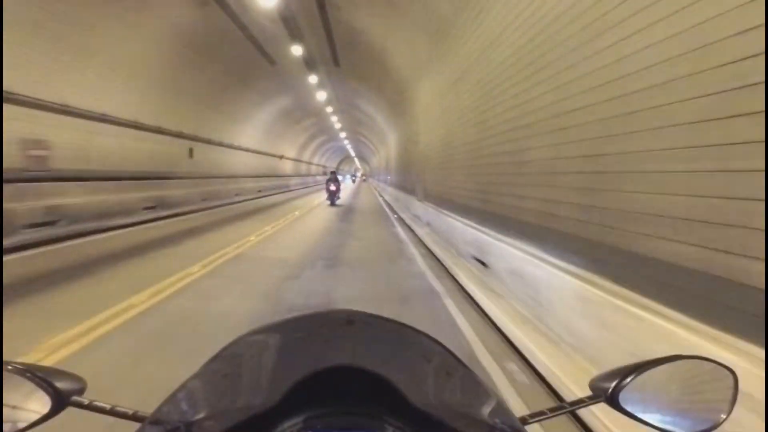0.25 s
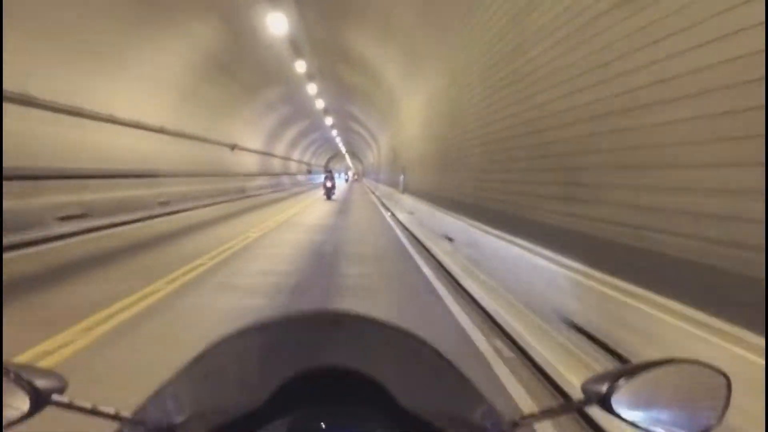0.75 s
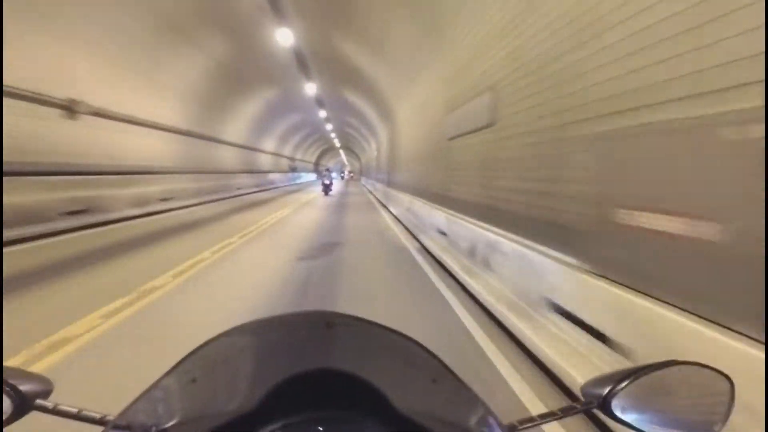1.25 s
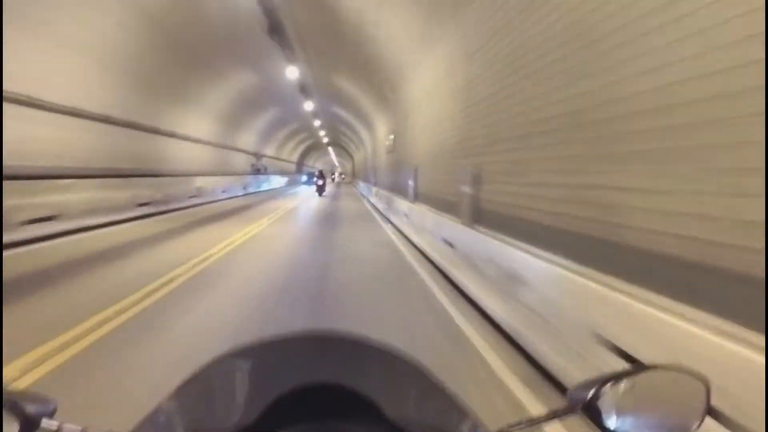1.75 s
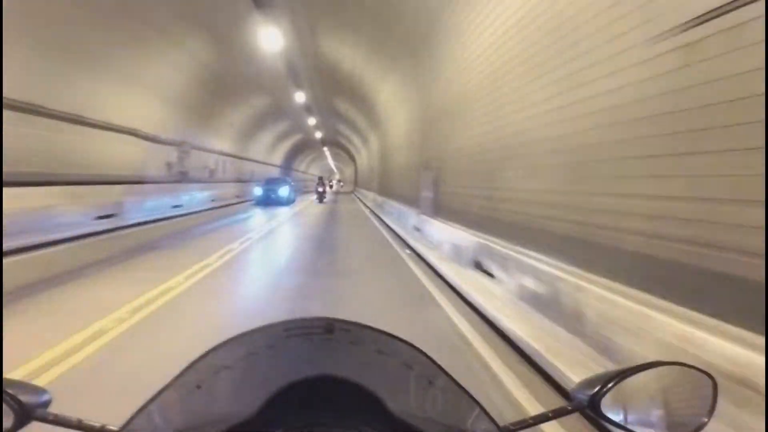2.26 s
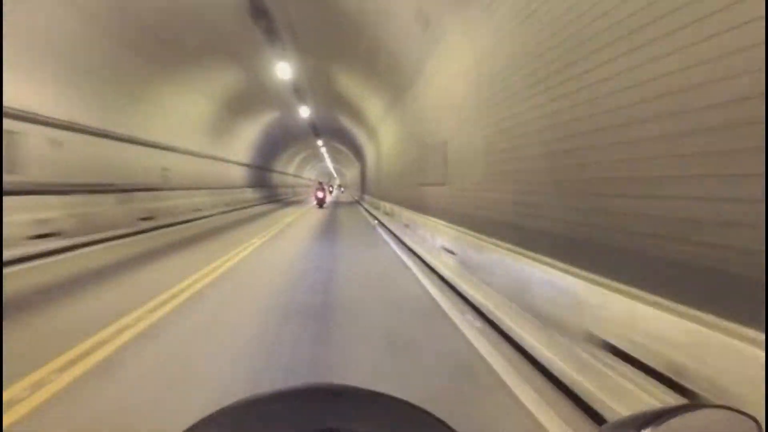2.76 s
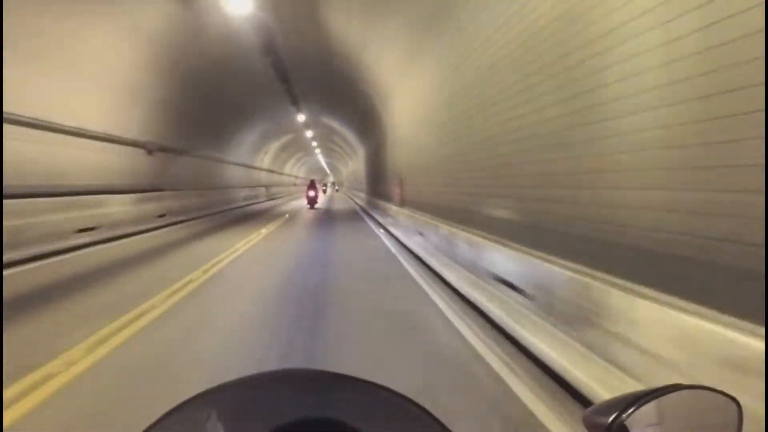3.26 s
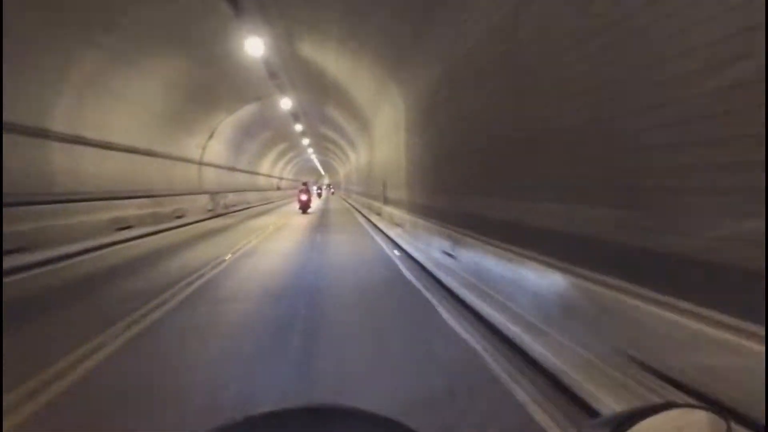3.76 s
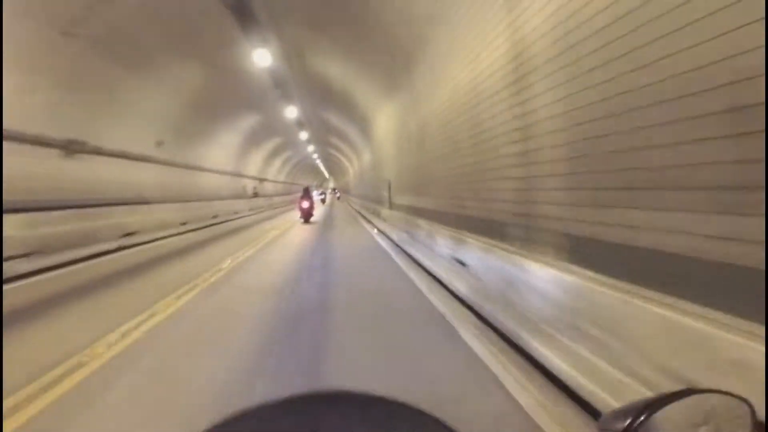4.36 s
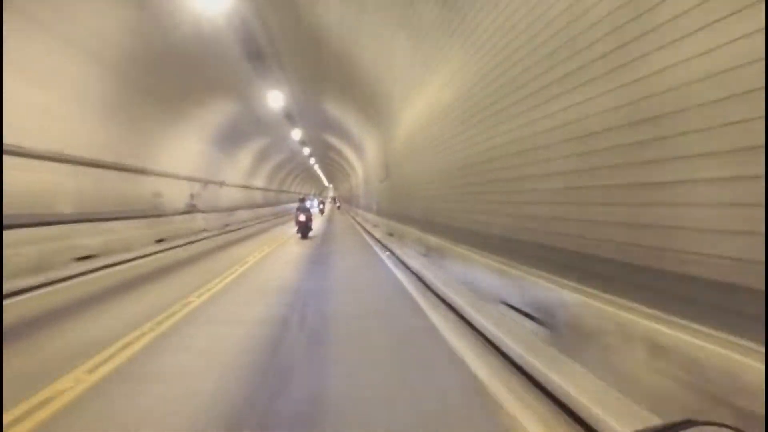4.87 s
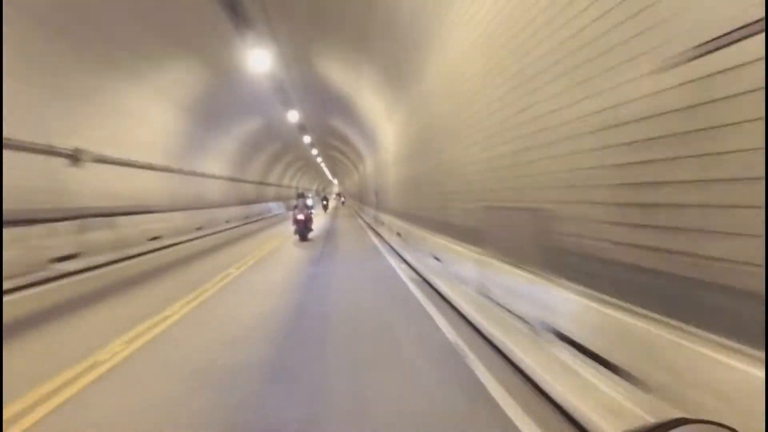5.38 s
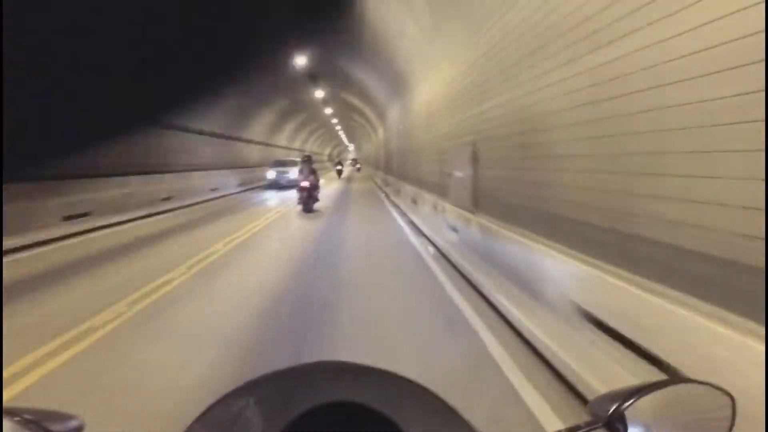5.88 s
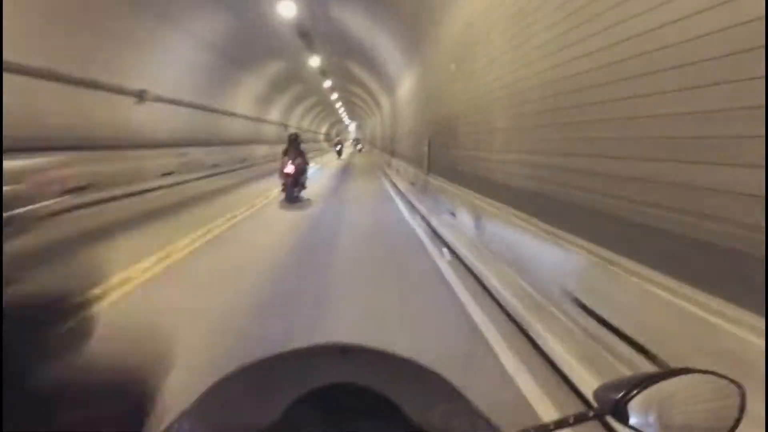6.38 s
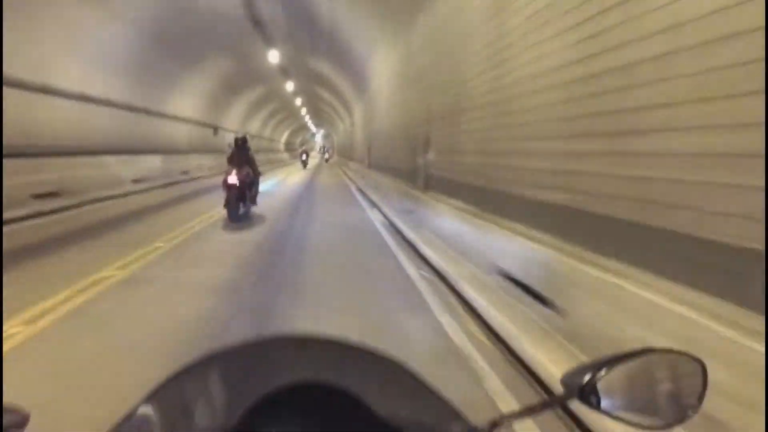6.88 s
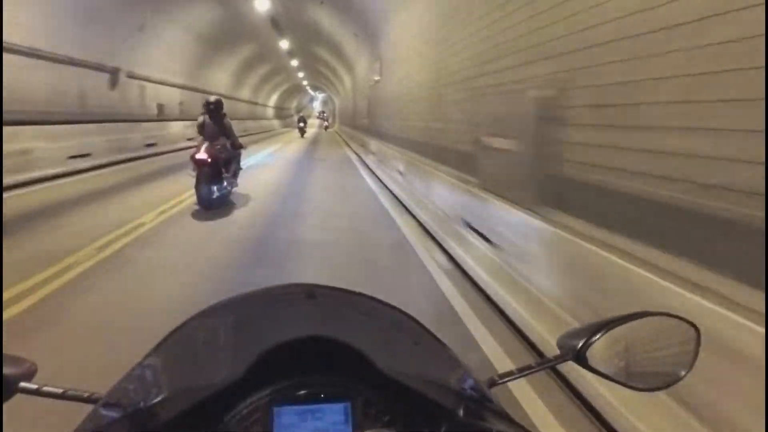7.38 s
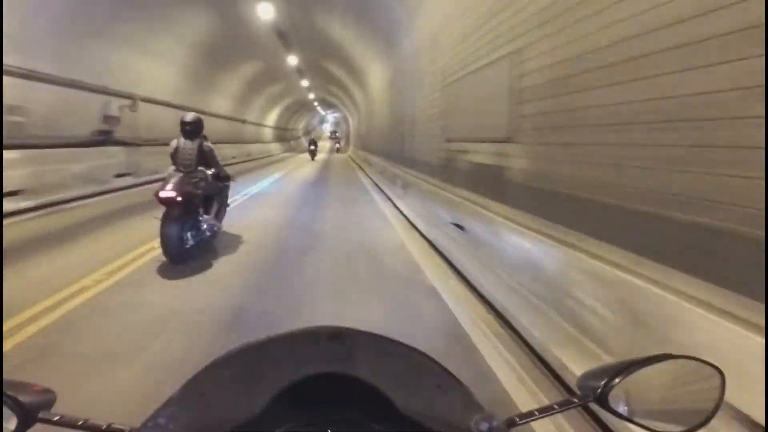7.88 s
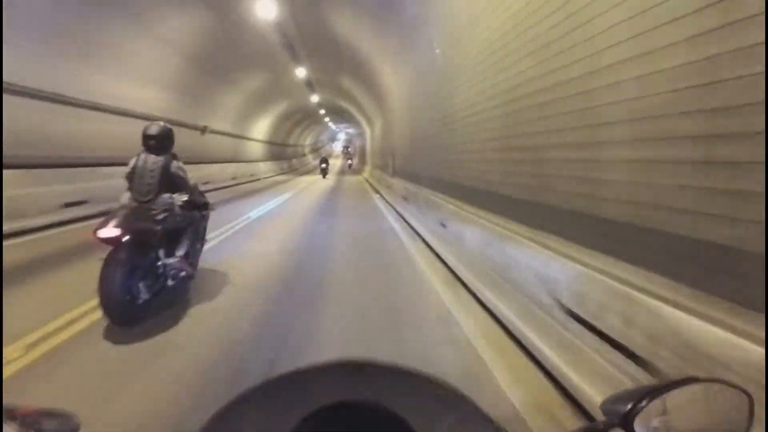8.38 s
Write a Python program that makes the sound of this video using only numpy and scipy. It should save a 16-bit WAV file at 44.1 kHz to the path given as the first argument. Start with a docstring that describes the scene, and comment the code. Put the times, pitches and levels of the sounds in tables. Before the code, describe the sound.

Several sport motorcycles drone and rev through a tiled road tunnel, one close engine blipping its throttle, with wind buffeting and a sharp late backfire.

```python
"""Motorcycles in a tiled tunnel

Five four-cylinder sport motorcycles pass through a tiled road tunnel, heard from two ports on a helmet.
Each engine is a gliding firing note with overtones and puffs of gas; the near one blips its throttle.
Noise bursts crack in a pipe and a crackling backfire rolls back along the tube.
Echo tails smear everything; three bands of noise make wind buffeting, a blurred roar and hiss."""
import sys
import numpy as np
from scipy import signal
from scipy.fft import rfft, irfft, next_fast_len
from scipy.io import wavfile
from scipy.ndimage import uniform_filter1d, minimum_filter1d, map_coordinates

SR = 44100
rng = np.random.default_rng(int(sys.argv[2]) if len(sys.argv) > 2 else 0)


def master(y):
    """Save y as 16-bit WAV."""
    cut = np.clip(np.atleast_2d(y).T, -1, 1)
    pcm = np.round(cut * 32767)  # scale
    wavfile.write(sys.argv[1], SR, pcm.astype(np.int16))


N = 380583

# Course of each engine: [t/s, firing rate f/Hz, firing note level/dB, overtones level/dB, half multiples level/dB]
LEADER = [(0.0, 213, -34, -23.5, -40), (0.5, 252.4, -32.5, -22, -32.5), (1.0, 285.1, -26.5, -24.5, -36.5),
          (1.36, 306.9, -27.5, -24.5, -42), (1.47, 273.3, -20, -33.5, -50), (1.58, 230, -28, -23.5, -40),
          (2.05, 244.2, -21.5, -26, -46), (2.3, 252.3, -39.5, -19, -41), (2.37, 250.7, -36, -28.5, -42),
          (2.5, 248.2, -35, -39, -45)]
SHIFTER = [(0.0, 283.7, -31, -32.5, -16), (0.2, 297.7, -35, -24.5, -25), (0.47, 306.4, -33, -24, -25),
           (0.62, 257.4, -25.5, -45, -38), (0.85, 217.4, -33.5, -22.5, -40)]
CRUISER = [(0.95, 237.6, -47, -31, -48.5), (1.6, 242.4, -27, -23, -34.5), (2.15, 239.9, -31.5, -40, -27),
           (2.4, 224.8, -26, -36, -30.5), (2.9, 226.5, -26.5, -40, -29), (3.3, 221, -29, -44, -37),
           (3.5, 217.6, -25.5, -45.5, -35.5), (3.9, 207.3, -27.5, -48, -25), (4.2, 199, -22, -42, -27),
           (4.6, 194.3, -28, -39, -26), (5.0, 188.4, -22.5, -48, -34.5), (5.5, 179.4, -27.5, -33, -23),
           (5.65, 178.3, -31.5, -40.5, -28.5), (6.1, 178.3, -36, -41, -29.5)]
NEAR = [(2.32, 251.3, -23.5, -34, -44), (2.44, 252.8, -18, -36.5, -42), (2.51, 228.3, -22.5, -31.5, -64),
        (2.85, 240.4, -19, -37, -55), (3.12, 249, -23, -43.5, -37.5), (3.22, 191.5, -19.5, -48, -30),
        (3.45, 194.7, -20, -48.5, -35.5), (3.7, 192.6, -19.5, -48.5, -42.5),
        (4.07, 190.5, -21.5, -38, -35.5), (4.2, 229.5, -22, -38, -35.5), (4.6, 230.6, -23.5, -38, -25),
        (5.04, 224.3, -24, -39, -24), (5.14, 222.5, -23, -37, -30), (5.65, 214.5, -22, -38, -31),
        (5.9, 211.5, -23, -40.5, -36.5), (6.5, 203.3, -20.5, -37.5, -38), (6.95, 199.8, -22.5, -43, -45),
        (7.2, 194.5, -13.5, -30.5, -47.5), (7.45, 196.7, -23.5, -31.5, -35.5), (7.8, 186.1, -18, -37, -34),
        (7.9, 172, -24, -34.5, -38), (8.0, 180, -25, -37, -39), (8.05, 190, -18, -25, -40),
        (8.1, 194, -19, -26, -40), (8.13, 186, -21, -42, -39), (8.2, 188.3, -19, -39, -31.5),
        (8.63, 180.1, -19.5, -36.5, -35)]
FOLLOWER = [(7.95, 159, -31.5, -31, -21), (8.12, 164.4, -31.5, -36.5, -39), (8.19, 167.6, -29, -29, -26.5),
            (8.25, 166.3, -33.5, -31.5, -29), (8.31, 168.2, -31, -21.5, -22),
            (8.38, 168.5, -31.5, -29, -25.5), (8.5, 167.5, -40.5, -30, -28.5), (8.63, 169, -40, -34.5, -36)]
# Exhaust overtones; half multiples come from uneven cylinders:
# [multiple of the firing rate, level/dB added to the engine's overtones or half multiples]
LEADER_PIPE = [(1.5, -8.5), (2, 1), (3, -9), (3.5, -13), (4, -13), (5, -21), (6, -24), (7, -29)]
SHIFTER_PIPE = [(2, -10), (3, -7.5), (4, -20)]
CRUISER_PIPE = [(.5, -12), (1.5, -7.5), (2, -6), (3, -6.5), (4, -11), (5, -17.5)]
NEAR_PIPE = [(.5, -14), (1.5, -1), (2, 3), (2.5, -2.5), (3, -8), (4, -12), (5, -20)]
FOLLOWER_PIPE = [(1.5, -3), (2, -6), (3, -4), (4, -5), (6, -16)]
# Gas rushing from the pipe, relative density: [f/Hz, level/dB per Hz]
RASP = [(300, -32), (600, 5.5), (1200, -5), (2500, -13), (5000, -54)]
# Throttle blips of the near engine: [t/s, rise f/Hz, rise time/s, settling time/s, overtone bark level/dB]
BLIPS = [(2.505, 56, .085, .2, 11), (2.845, 46, .085, .17, 18), (4.085, 20, .11, .04, 19),
         (7.9, 46, .07, .25, 17)]
# Irregular throb of the near engine: [t/s, depth/dB]
THROB = [(2.3, 3.5), (4.0, 3.5), (4.8, 3.5), (5.6, 2.5), (6.2, 0), (7.0, 0), (7.3, 2.5), (8.63, 2.5)]
# Exhaust pops: [t/s, level/dB, burst dull above f/Hz, snap level/dB, length/s]
POPS = [(4.09, -14, 600, -55, .018), (7.3163, -4, 1200, -15, .0068), (7.495, -9, 400, -55, .012),
        (7.733, -11, 400, -55, .01), (7.908, -15, 480, -55, .012)]
# Backfire rolling back along the tube, then once more from farther off: [t/s, level/dB, hold/s]
RETURNS = [(7.324, -25.5, 0.19), (7.649, -37, .085)]
# Colour of those returns, relative density: [f/Hz, level/dB per Hz]
RETURN_TONE = [(350, -36), (700, -15.5), (1050, 2.5), (1700, -9.5), (2700, -9), (3100, -23.5),
               (4600, -16.5), (6000, -28.5), (7500, -28.5), (10000, -38), (13500, -50), (14200, -90)]
# Tunnel decay: [f/Hz, time to fall 60 dB/s]
TUBE = [(150, 0.88), (1000, 1), (8000, 0.35)]
# Air noise before the gusts: [t/s, buffet level/dB, roar level/dB, hiss level/dB]
AIR = [(0.0, -34, -19.5, -45.5), (0.8, -33, -26.5, -47.5), (1.35, -30, -20, -44.5), (2.1, -32, -25.5, -48),
       (2.9, -28.5, -22, -46.5), (3.6, -27.5, -23, -47), (4.3, -26.5, -22, -46), (5.0, -33, -25.5, -49.5),
       (5.6, -27, -23, -47), (6.2, -33.5, -25.5, -47.5), (6.36, -35, -30.5, -56), (6.95, -37.5, -32.5, -60),
       (7.3, -25, -22, -45), (7.9, -34.5, -24, -50.5), (8.63, -28.5, -32, -54)]
# Gusts: [t/s, swell level/dB, half width/s]
GUSTS = [(.24, 3, 0.015), (1.07, 4, .02), (1.78, 4, 0.02), (2.24, 0, .04), (2.42, 2.5, 0.046),
         (2.68, 2.5, .08), (3.04, 2, 0.026), (3.38, 2.5, 0.18), (3.70, 2.5, 0.035), (3.88, 4.5, 0.023),
         (4.1, 6, 0.044), (4.4, 2.5, 0.05), (4.75, 5, 0.086), (4.99, 6.5, 0.024), (5.19, 2, 0.056),
         (5.64, 4, 0.062), (5.89, 5.5, 0.05), (6.25, 6, 0.041), (6.49, 11.5, 0.1), (6.75, 6.5, 0.093),
         (7.11, 6, 0.018), (7.72, 4.5, 0.031), (8.05, 1.5, .1), (8.34, 3, 0.14)]
# Colours of the air noise, relative density: [f/Hz, level/dB per Hz]
BUFFET = [(12, -39.5), (20, -8.5), (53, 0.5), (129, -2.5), (160, 2), (210, -27.5), (350, -120)]
ROAR = [(71, -49), (120, -15), (151, -27), (214, -2), (277, -10.5), (468, -12), (542, -11), (637, -17),
        (1060, -21.5), (3000, -42.5), (3900, -51.5), (6600, -120)]
HISS = [(1200, -15), (2000, -6), (2600, -2.5), (3200, -4), (4500, -5), (5800, -11), (7000, -12),
        (9000, -18.5), (11000, -25), (13500, -36.5), (13900, -91)]
# Likeness of the diffuse sound at the two ports: [f/Hz, correlation]
ALIKE = [(30, 0.7), (100, 0.76), (200, 0.95), (900, 0.86), (1600, 1), (2200, 0.34), (4500, 0.36),
         (5500, .1), (10000, .05)]
# Left port over right: [f/Hz, level/dB]
LEAN = [(60, 2), (200, 0.5), (1200, -.5), (4000, 2), (12000, 6)]
# Phase by which the left port leads: [f/Hz, phase/rad]
AHEAD = [(80, .04), (350, 0.1), (900, 0.14), (1400, 0.88), (1650, 0.81), (2400, 2.03), (3400, 3.85),
         (4200, 4.3), (5200, 4.05)]
# Brief level changes, mostly dips: [t/s, whole level/dB, further firing note level/dB, half width/s]
DIPS = [(0.265, -7, 0, 0.01), (1.704, -4, -3, 0.018), (2.308, -5.5, -7.5, 0.025), (2.4, 1.5, -8.5, 0.022),
        (2.518, 1.5, -7.5, .014), (2.678, 2, -1, 0.012), (2.757, -3, -2.5, 0.018), (2.846, -3.5, -7, 0.02),
        (2.928, -5, -2, 0.013), (3.045, -1.5, 5, 0.0074), (3.097, -6.5, -2.5, 0.02),
        (3.334, -2, -10, 0.016), (3.437, -5, -6, 0.0089), (3.626, -5.5, -3, 0.032),
        (3.758, -5, -1.5, 0.017), (3.829, -9.5, -7, 0.0082), (3.995, -3.5, -4, 0.023),
        (4.196, -1, -14, .04), (4.333, -2, -9, 0.035), (5.458, -6.5, 4.5, 0.025), (7.065, 4, -13.5, 0.024),
        (7.206, -7.5, 1.5, 0.044), (7.244, 0.5, -10.5, 0.022), (7.329, -5.5, 1, 0.012),
        (7.363, 0, -7.5, 0.056), (7.485, 2.5, -5.5, 0.018), (7.653, -1.5, -0.5, 0.014),
        (7.758, 1.5, -8.5, 0.02), (8.179, 3, -3.5, 0.012), (8.237, -5.5, -2, 0.029),
        (8.363, -1.5, -12, .018), (8.46, -4.5, -6.5, 0.028)]

BARK_AFTER, BARK_LASTS = .47, .47  # middle and half width of a bark, as shares of the rev rise
NOTE_YIELDS, HALF_BARKS = 0.3, 0.3  # the note sinks and half multiples swell by these shares of the bark
THROBS_PER_S = 26  # random knots a second
PUSH_S, OVERDRIVE, EDGE = .0022, 3, 3  # pop edges are dull above EDGE times the burst's own limit
RETURN_ATTACK_S, RETURN_FADE_DB_PER_S = 0.02, 141
BUFFET_GROWS, ROAR_GROWS = 1.1, 1  # dB per dB of gust
HOLD_DB, LIMIT, TOP_HZ = -17, .6, 15400  # gain control threshold, peak ceiling, band limit


def engines():
    """The five motorcycles together, each with its own depth of flutter and rasp."""
    return (engine(LEADER, LEADER_PIPE, flutter_db=.8, rasp_db=-9)
            + engine(SHIFTER, SHIFTER_PIPE, flutter_db=-1.0, rasp_db=-6.0)
            + engine(CRUISER, CRUISER_PIPE, flutter_db=2.6, rasp_db=-8)
            + engine(NEAR, NEAR_PIPE, flutter_db=1.2, rasp_db=-11, blips=BLIPS, throb=THROB)
            + engine(FOLLOWER, FOLLOWER_PIPE, flutter_db=1.3, rasp_db=-6))


def engine(rows, pipe, flutter_db, rasp_db, blips=(), throb=((0, 0),)):
    """The firing note and its overtones, each fluttering in passing wall echoes, and a puff of gas per firing."""
    hz, note_db, over_db, half_db = blipped(rows, blips, throb)
    t = np.arange(N) / SR
    fade_in, fade_out = t - rows[0][0] + 0.05, rows[-1][0] + 0.063 - t
    heard = np.clip(np.minimum(fade_in, fade_out) / 0.077, 0, 1)
    unsteady_hz = hz * (1 + 0.002904 * wobble(25))
    turn = 2 * np.pi * np.cumsum(unsteady_hz) / SR
    note_gain = amp(note_db + note_dips_db() + 1.3 * flutter_db * wobble(28))
    tone = note_gain * np.sin(turn + .3 * wobble(24))
    for k, db in pipe:
        base_db = half_db if k % 1 else over_db
        # high multiples flutter most
        level_db = base_db + db + flutter_db * np.clip(k / 2, 1, 2.5) * wobble(24)
        # uneven firing blurs high multiples most
        tone += amp(level_db) * np.sin(k * (turn + .14 * wobble(30)))
    pulsed_noise = (1 + np.cos(turn)) ** 3 * rng.standard_normal(N)
    puffs = unit(filtered(pulsed_noise, lambda f: amp(along(RASP, f))))
    return heard * (np.sqrt(2) * tone + amp(over_db + rasp_db) * puffs)


def blipped(rows, blips, throb):
    """An engine's course; each blip flicks the revs up, lets them settle, and barks on the way up."""
    hz, note_db, over_db, half_db = curves(rows)
    t = np.arange(N) / SR
    for s, rise_hz, rise_s, settle_s, _ in blips:
        hz = hz + rise_hz * np.interp(t - s, [0, rise_s, rise_s + settle_s], [0, 1, 0])
    barks = [(s + BARK_AFTER * rise_s, db, BARK_LASTS * rise_s) for s, _, rise_s, _, db in blips]
    bark_db = swells(barks)
    throb_db = curves(throb)[0] * np.minimum(wobble(THROBS_PER_S), 1)
    note_db = note_db - NOTE_YIELDS * bark_db + throb_db
    over_db = over_db + bark_db + throb_db / 2
    return hz, note_db, over_db, half_db + HALF_BARKS * bark_db


def note_dips_db():
    """How much further the firing notes sink or rise at each brief level change."""
    return swells([(s, db, width) for s, _, db, width in DIPS])


def pops():
    """Unburnt fuel cracks in the pipe: a steep low push, a squared-off burst that stops short, and a snap."""
    out, t = np.zeros(N), np.arange(SR // 20) / SR
    for s, db, dull_hz, snap_db, length in POPS:
        noise = rng.standard_normal(len(t))
        lasts = np.exp(-(t / length) ** 4)
        dull = lowpass(noise, 3, dull_hz)
        push = (1 - t / PUSH_S) * np.exp(-t / PUSH_S)
        burst = lasts * np.tanh(OVERDRIVE * unit(dull)) * np.minimum(2 * t / PUSH_S, 1)
        body = lowpass(.75 * push + .85 * burst, 2, EDGE * dull_hz)
        snap = lasts * lowpass(noise, 1, 2600)
        out[round(s * SR):][:len(t)] += amp(db) * (body + amp(snap_db) * snap)
    return out


def backfire():
    """Each return from the tube swells in, holds and fades, crackling."""
    t = np.arange(N) / SR
    shape = np.zeros(N)
    for s, db, hold in RETURNS:
        fade_db = RETURN_FADE_DB_PER_S * np.maximum(t - s - hold, 0)
        shape += amp(db - fade_db) * np.clip((t - s) / RETURN_ATTACK_S, 0, 1)
    crackle = amp(2.4 * wobble(320) + .8 * wobble(45))
    return shape * unit(crackle) * rush(RETURN_TONE, patchy_db=0.5)


def tunnel(x):
    """Two unrelated echo tails, 700 samples late; each frequency dies at its own speed."""
    hz, t, z = signal.stft(rng.standard_normal((2, SR // 2)), SR, nperseg=256)
    decay_db = -60 * t / along(TUBE, hz)[:, None]
    tail = signal.istft(z * amp(decay_db), SR, nperseg=256)[1]
    late = np.pad(x, (700, 0))[None]
    return signal.fftconvolve(late, tail / np.linalg.norm(tail[0]), axes=1)[:, :N]


def air():
    """Wind buffeting, the blurred roar of engines and tyres, and wind hiss, all riding the same gusts."""
    buffet_db, roar_db, hiss_db = curves(AIR)
    gust_db, flicker = swells(GUSTS), wobble(11)
    buffet = amp(buffet_db + BUFFET_GROWS * gust_db + 1.9 * wobble(14)) * rush(BUFFET, patchy_db=-0.8)
    roar = amp(roar_db + ROAR_GROWS * gust_db + 0.67 * flicker) * rush(ROAR, patchy_db=1.6)
    hiss = amp(hiss_db + gust_db + 0.26 * flicker) * rush(HISS, patchy_db=1.5)
    return buffet + roar + hiss


def rush(spectrum, patchy_db):
    """Two unrelated noises, rms 1 together, sharing patches of random gain over time and frequency."""
    z = signal.stft(rng.standard_normal((2, N)), nperseg=512)[2]
    field = rng.standard_normal(z.shape[1:])
    for axis in (0, 1):
        field = uniform_filter1d(field, size=8, axis=axis)
    pair = signal.istft(z * amp(patchy_db * unit(field)), nperseg=512)[1][:, :N]
    return unit(filtered(pair, lambda hz: amp(along(spectrum, hz))))


def ports(hz):
    """Responses of the two ports: the left leads in phase and is stronger at the bottom and top."""
    return np.array([amp(side * along(LEAN, hz) / 2) * np.exp(side * .5j * along(AHEAD, hz))
                     for side in (1, -1)])


def dips():
    """Gain of the brief changes in the whole level."""
    return amp(swells([(s, db, width) for s, db, _, width in DIPS]))


def amp(db):
    """Gain of a level in dB."""
    return 10 ** (np.asarray(db) / 20)


def unit(x):
    """Scaled to rms 1."""
    return x / np.sqrt(np.mean(x ** 2) + 1e-20)


def along(points, hz):
    """Values between (f/Hz, value) points, on a log frequency axis."""
    f, v = np.transpose(points)
    return np.interp(np.log(hz + 1), np.log(f + 1), v)


def curves(rows):
    """One value per sample for each column after the time."""
    s, *cols = np.transpose(rows)
    return [np.interp(np.arange(N) / SR, s, c) for c in cols]


def swells(rows):
    """Sum of bell-shaped swells from (t/s, level/dB, half width/s) rows, in dB."""
    t = np.arange(N) / SR
    return sum(db * np.exp(-((t - s) / width) ** 2) for s, db, width in rows)


def wobble(rate):
    """A smooth random curve with rate knots a second."""
    return map_coordinates(rng.standard_normal(int(N * rate / SR) + 4), [np.arange(N) * rate / SR])


def lowpass(x, order, hz):
    """x dulled above hz."""
    return signal.sosfilt(signal.butter(order, hz, fs=SR, output="sos"), x)


def filtered(x, response):
    """x times a complex response of frequency."""
    m = next_fast_len(N + SR // 2)
    return irfft(rfft(x, m) * response(np.fft.rfftfreq(m, 1 / SR)), m)[..., :N]


def spread(hz):
    """Shares of mid and side that give the two ports their likeness at each frequency."""
    angle = np.arccos(np.clip(along(ALIKE, hz), -1, 1)) / 2
    return np.array([np.cos(angle), np.sin(angle)])


def scene():
    """Direct engines reach both ports, diffuse sound is shared by frequency, direct pops strike both at once."""
    direct, cracks = engines(), pops()
    diffuse = amp(-7.5) * tunnel(direct + cracks) + backfire() + air()
    mid, side = filtered(diffuse, spread)
    at_ports = filtered(direct + np.array([mid + side, mid - side]), ports)
    return dips() * (cracks + at_ports)


def record(dry):
    """Gain control halves the excess in dB, a quick limiter holds peaks, and a band limit cuts the top."""
    power = np.abs(uniform_filter1d(np.mean(dry ** 2, axis=0), size=2000))
    level_db = 10 * np.log10(power + 1e-12)
    excess_db = uniform_filter1d(np.maximum(level_db - HOLD_DB, 0), size=1000)
    held = dry * amp(-excess_db / 2)
    need = np.minimum(1, LIMIT / (np.abs(held).max(axis=0) + 1e-9))
    gain = uniform_filter1d(minimum_filter1d(need, size=800), size=400)
    return filtered(held * gain, lambda hz: hz < TOP_HZ)


dry = scene()
out = record(dry)
master(out)
```